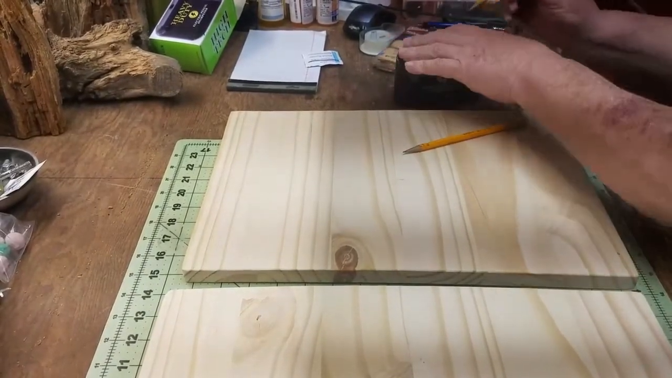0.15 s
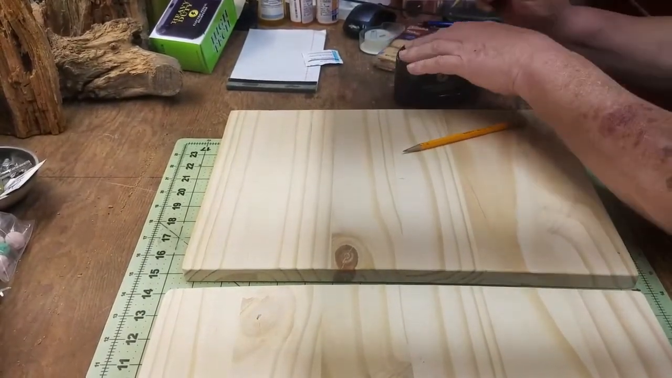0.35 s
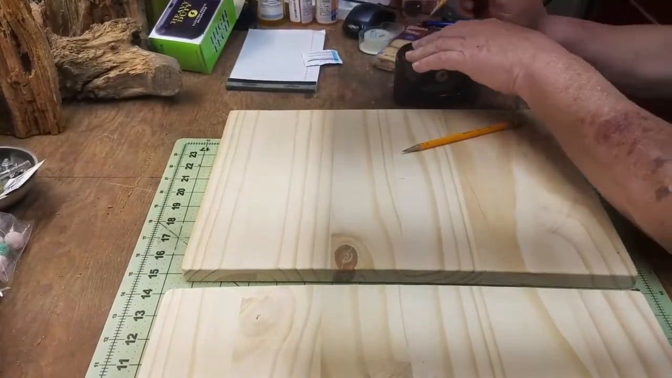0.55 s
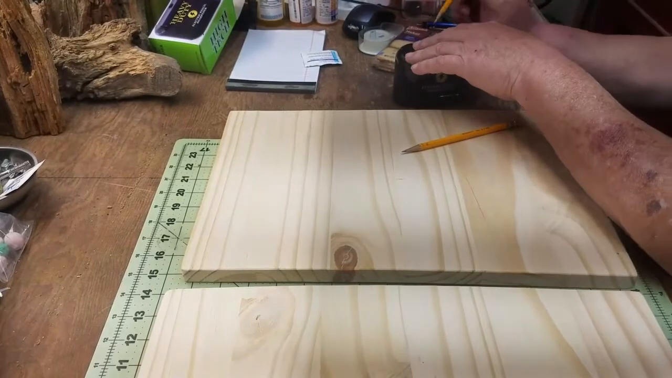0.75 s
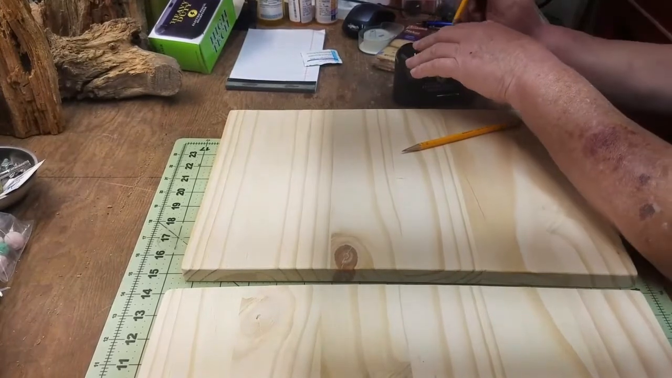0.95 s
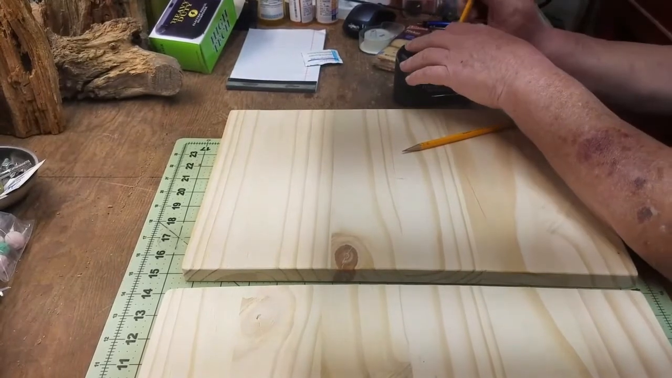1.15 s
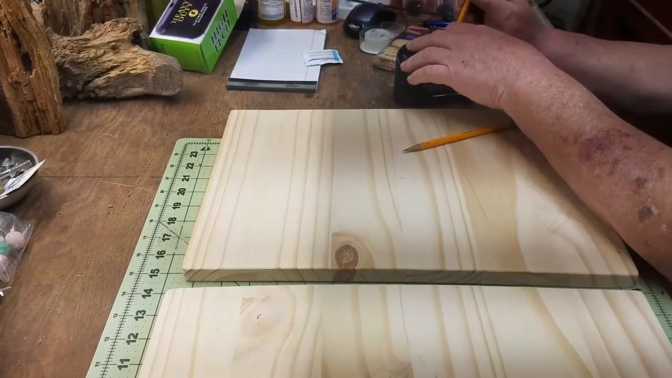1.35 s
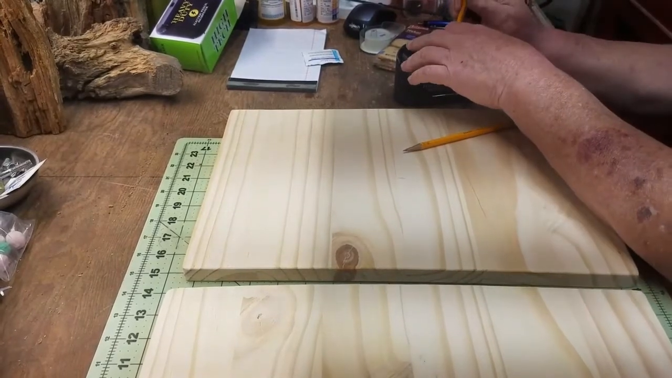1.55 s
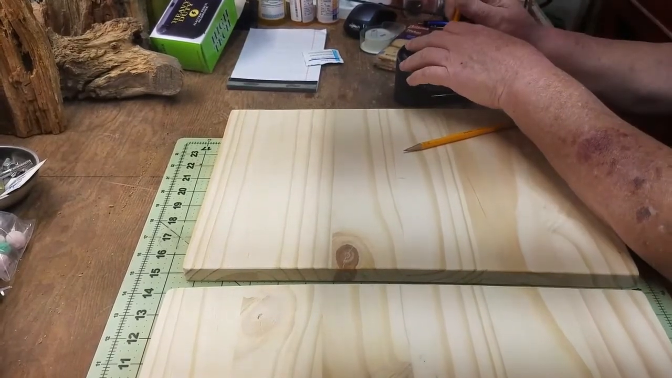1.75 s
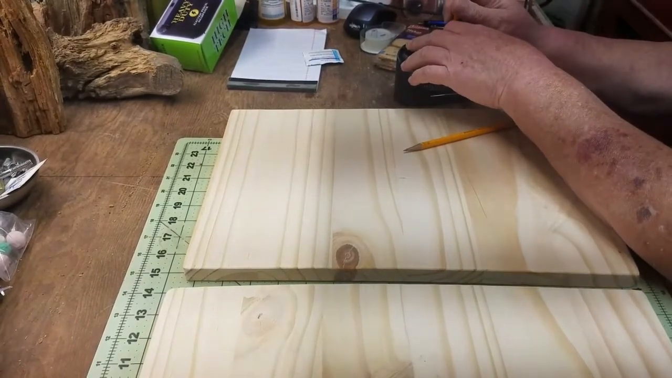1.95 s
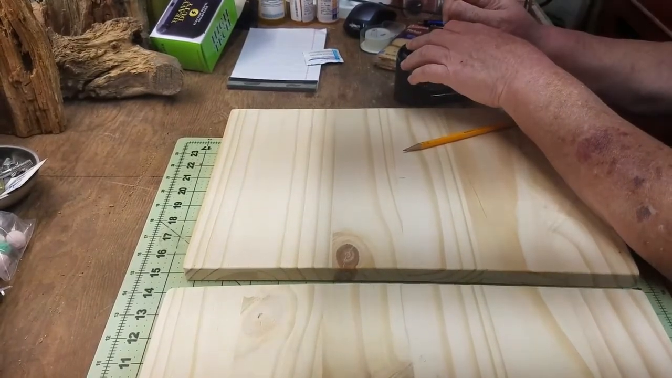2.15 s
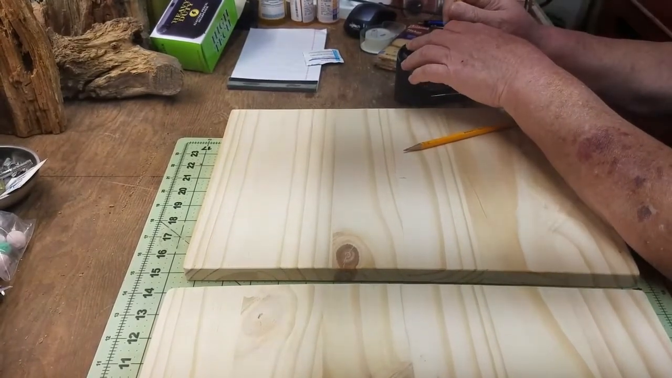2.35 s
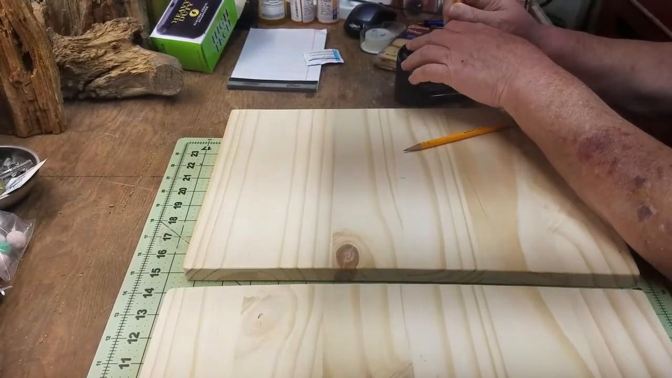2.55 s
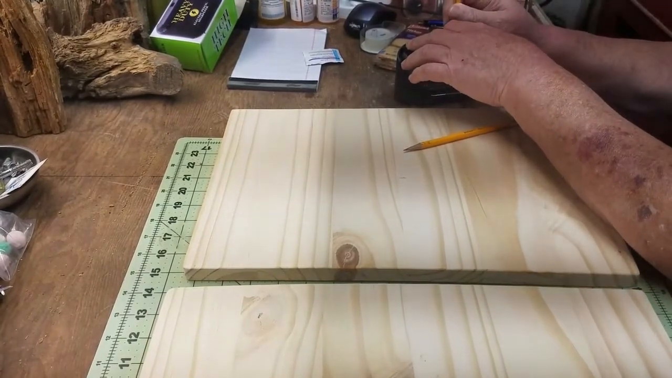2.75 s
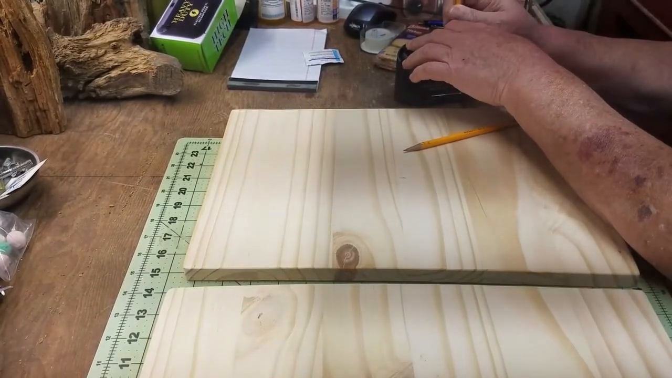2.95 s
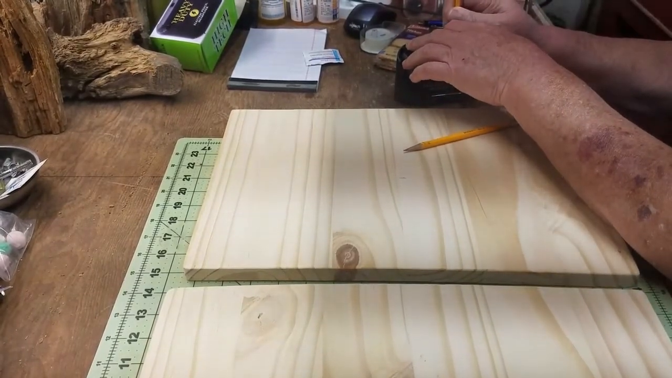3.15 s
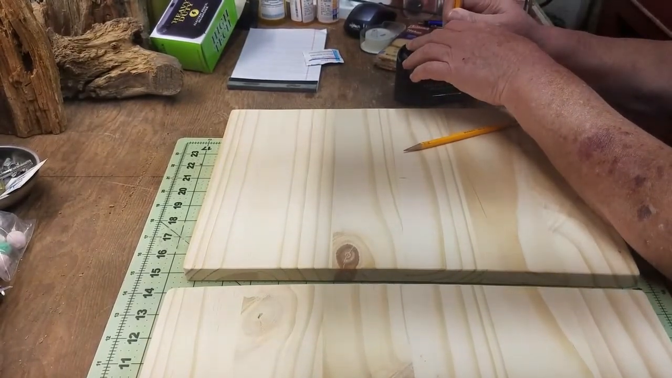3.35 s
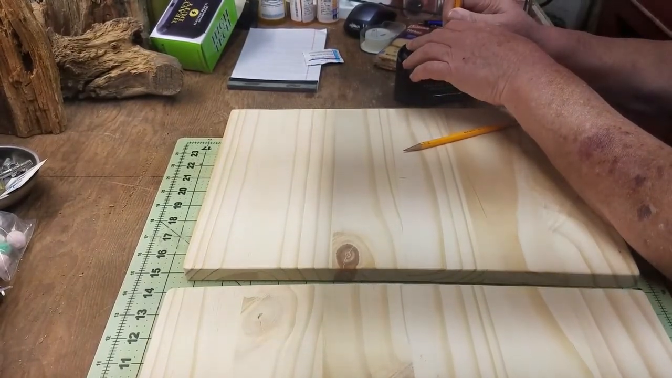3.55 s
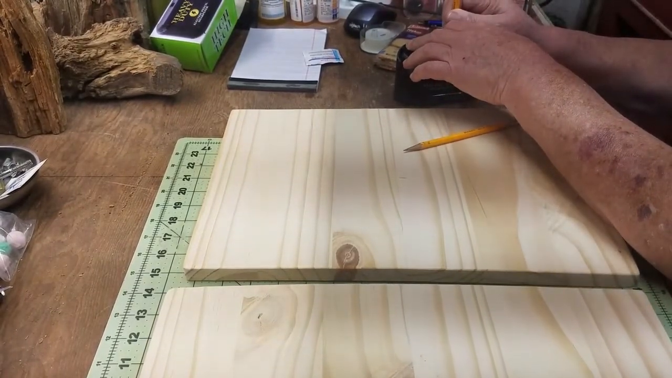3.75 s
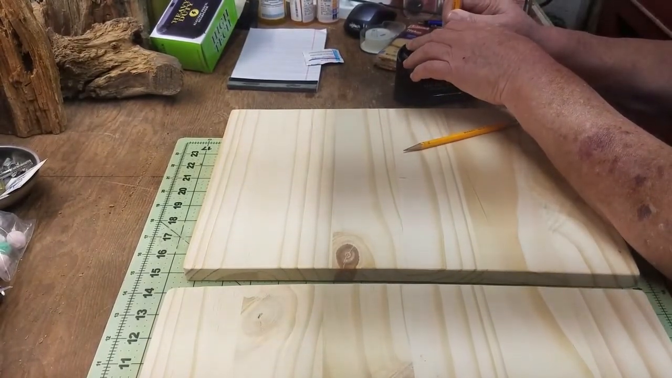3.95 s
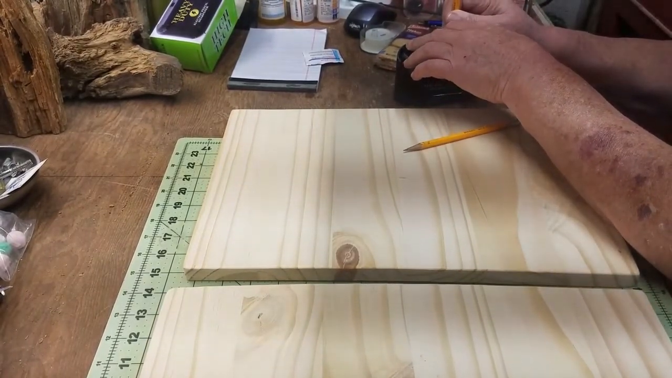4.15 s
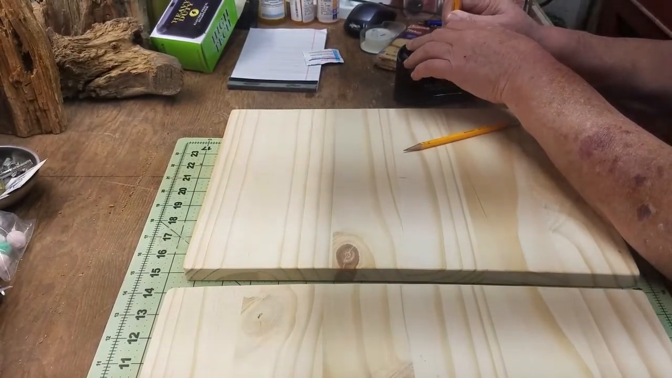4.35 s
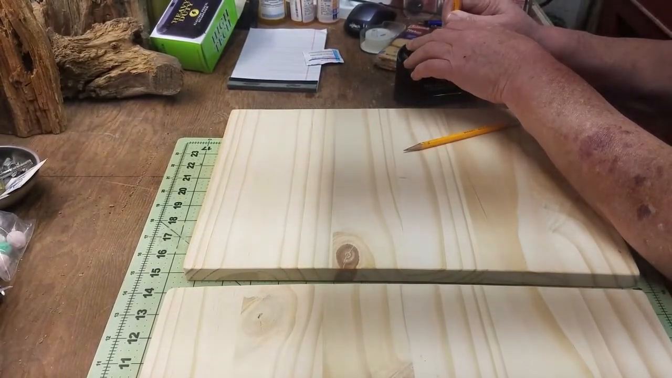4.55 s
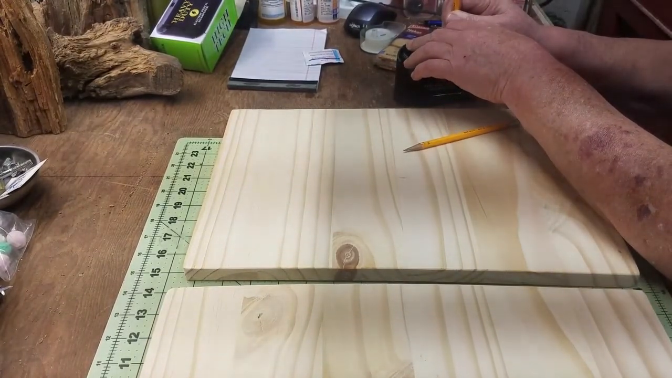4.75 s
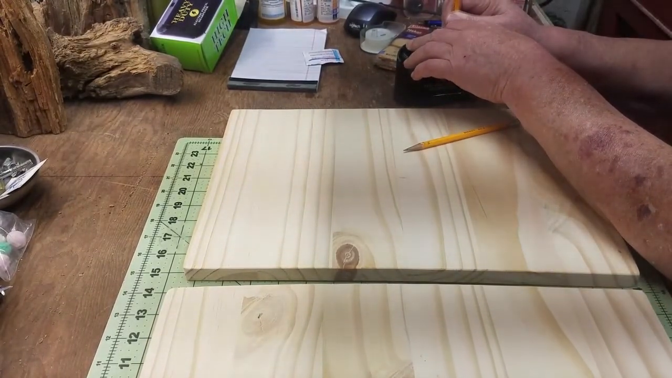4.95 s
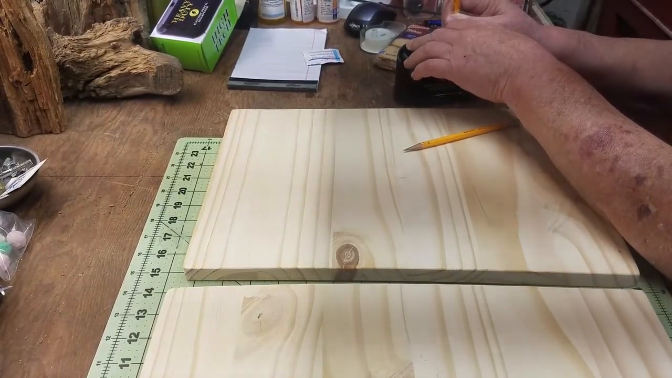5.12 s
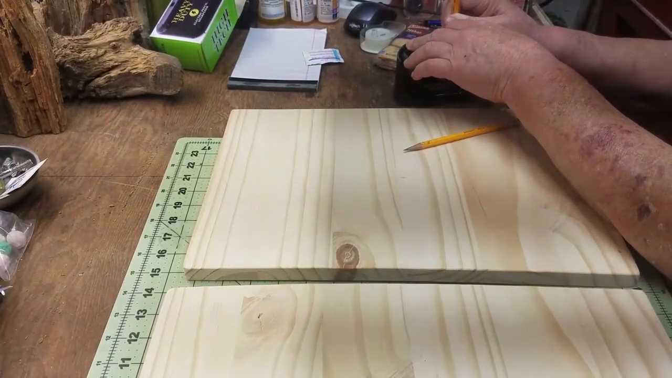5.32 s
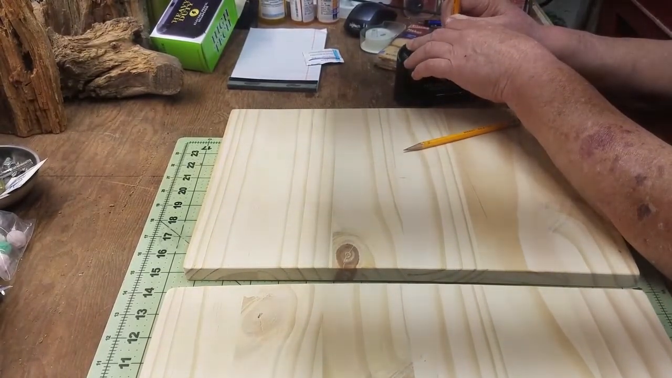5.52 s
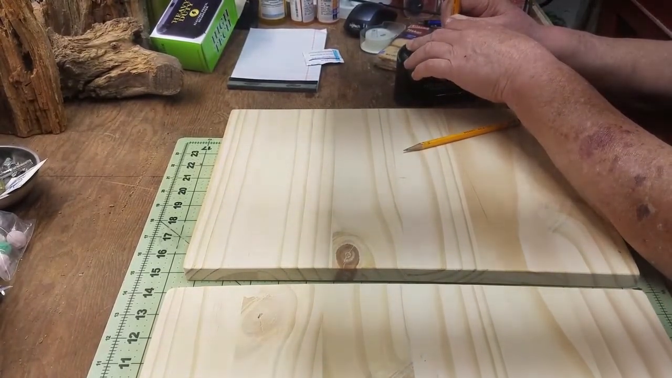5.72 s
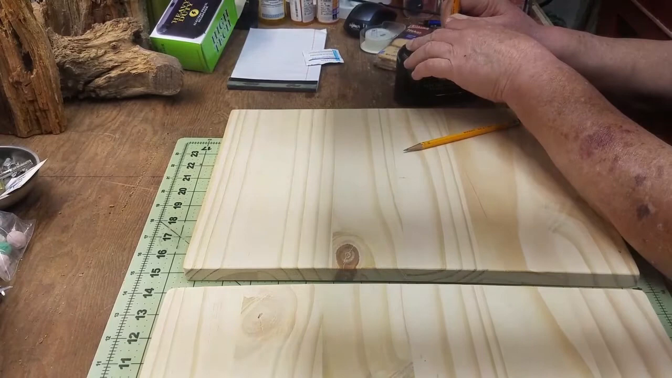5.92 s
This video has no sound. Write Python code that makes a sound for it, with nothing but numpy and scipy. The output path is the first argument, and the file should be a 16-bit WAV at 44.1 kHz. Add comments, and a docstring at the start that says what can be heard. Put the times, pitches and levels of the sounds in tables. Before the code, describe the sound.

After a few light taps in a quiet workshop, an electric pencil sharpener starts whining and rasping through a pencil.

```python
"""A quiet workshop, an electric pencil sharpener on a wooden workbench. A pencil taps the case, then the
motor spins up: a stack of shaft orders whines over the rasp of the cutter, which circles the pencil about
three times a second. The hollow case drones, the bench rumbles, and load makes the speed sag.
The sound drops out once for a moment; from there on the pencil is pressed harder."""
import sys
import numpy as np
from scipy import signal
from scipy.fft import rfft, irfft
from scipy.io import wavfile
from scipy.ndimage import uniform_filter1d

SR = 44100
rng = np.random.default_rng(int(sys.argv[2]) if len(sys.argv) > 2 else 0)


def generate_wav(signal):
    """Clip the signal to [-1, 1] and save it as 16-bit WAV at the path in sys.argv[1]."""
    frames = np.transpose(np.atleast_2d(signal))
    scaled = np.clip(frames, -1, 1) * 32767
    pcm = np.round(scaled).astype(np.int16)
    wavfile.write(sys.argv[1], SR, pcm)


N = 263718

# Noise spectra: (frequency [Hz], relative density [dB])
AIR_SPECTRUM = [(20, -1), (50, -13.5), (120, -10), (250, -15.5), (500, -15), (900, -23), (2000, -25.5),
                (5000, -32.5), (8500, -30.5), (11000, -35), (16000, -37)]
TAP_SPECTRUM = [(150, -45), (300, -10), (900, -11.5), (1500, -17), (3800, -17), (4300, -27), (9000, -28.5),
                (10000, -42), (16000, -45)]
RUMBLE_SPECTRUM = [(20, -56), (50, -8), (110, 2.5), (170, 2.5), (230, -24), (320, -30)]
DRONE_SPECTRUM = [(150, -40), (250, -14.5), (420, -7.5), (600, -11), (780, -7.5), (950, 3), (1150, -1.5),
                  (1350, -8), (1550, -17.5), (1800, -18), (2400, -39.5)]
RASP_SPECTRUM = [(900, -38), (1500, -17.5), (2000, -8.5), (2500, -9.5), (3100, -10.5), (4200, -8),
                 (5500, -9), (6800, -10), (9200, -11.5), (10600, -15.5), (13000, -19), (16000, -23)]
# Stereo likeness: (frequency [Hz], coherence [0..1])
AIR_COHERENCE = [(60, 0.31), (180, 0.087), (550, 0.26), (1650, -0.13), (4970, -0.0), (15000, 0.071)]
SHARPENER_COHERENCE = [(60, 0.36), (300, 0.48), (1400, 0.41), (3000, 0.075), (8000, 0.064), (15000, 0.2)]
# Stereo balance: (frequency [Hz], left minus right [dB])
AIR_PAN = [(30, 7), (120, -3.5), (600, -5), (3000, 1), (15000, 1)]
SHARPENER_PAN = [(60, 5), (180, -3.5), (550, -3), (1650, 0.5), (4970, -1), (15000, 1)]
# Case and cutter resonances and dips: (frequency [Hz], width [Hz], gain [dB])
TAP_MODES = [(356, 100, 7), (630, 120, 6), (2190, 200, 9), (3020, 250, 2), (5800, 630, 10.5),
             (8660, 600, 3)]
PRESSED_DRONE_DIPS = [(527, 180, -6.5), (1590, 150, -8), (940, 98, -3.5), (1310, 90, -1.5)]
RASP_MODES = [(3150, 240, -2), (4310, 250, -4.5), (7490, 460, 4.5), (8220, 570, 9)]
CASE_MODES = [(888, 35, 6), (1244.6, 70, 8), (1671, 59, 10.5), (2396, 79, 9.5)]
CUTTER_MODES = [(3560, 250, 3.5), (3920, 170, 2.5), (5770, 670, 5.5), (6150, 120, 6), (8500, 710, 7)]
# Room tones: (frequency [Hz], level [dB])
HUM_TONES = [(120, -65.5), (188, -74.5), (360, -72.5), (14900, -93)]
# Taps and ticks, and a faint decaying noise swell just before the motor starts: (time [s], onset level [dB],
# t60 [s], tilt [dB/octave])
CASE_BURSTS = [(.619, -55, .2, 1), (.631, -35.5, 0.18, -0.5), (0.636, -36.5, 0.13, 1.5), (.641, -40, 0.16, -1),
               (0.651, -58, 0.21, -3.5), (1.302, -58, .1, -2), (1.413, -53, 0.098, -2), (1.593, -60, .08, 12),
               (2.133, -49, 0.76, 0.5), (2.151, -38.5, 0.28, -3)]
# Bench rumble: (time [s], level [dB])
RUMBLE_LEVELS = [(2.3, -63), (2.36, -56), (3.16, -58.5), (3.86, -43), (5.27, -44.5), (5.3, -28.5),
                 (5.39, -54), (5.59, -43), (5.97, -46)]
# Motor, a list each before and after the drop-out:
# (time [s], shaft speed [Hz], grinding level [dB], loud-order gain [dB])
MOTOR_RUN = [
    [(2.36, 243.3, -20.5, -0.5), (2.41, 246.2, -19.5, 2.5), (2.54, 246.4, -19.5, -1),
     (2.63, 243.8, -20, 0.5), (2.84, 246.9, -22, -2), (2.93, 245.5, -20.5, 0), (3.03, 248, -19.5, -0.5),
     (3.05, 245.9, -19, -0.5), (3.16, 246.9, -19, -3), (3.25, 240.8, -19.5, 0.5), (3.38, 245.2, -18.5, 0.5),
     (3.64, 243.2, -20, 0), (3.71, 246.1, -17.5, 0), (3.85, 243.1, -18, -0.5), (4.06, 248.1, -18.5, 0),
     (4.15, 243.4, -17.5, 0), (4.34, 245.1, -18.5, 0.5), (4.42, 241.7, -17.5, 0.5)],
    [(4.48, 242.6, -16.5, -1), (4.542, 238.8, -18, -1.5), (4.646, 242.1, -20.5, 0),
     (4.716, 239.1, -19.5, 0), (4.774, 243.6, -20.5, 1.5), (4.864, 237.9, -21, 1),
     (4.894, 241.4, -17.5, 0.5), (4.96, 241.4, -19, -1), (4.998, 234.1, -20.5, -1.5),
     (5.122, 240, -17.5, -0.5), (5.188, 238.6, -19.5, 0.5), (5.264, 242.4, -19, 1),
     (5.326, 238.9, -19, 0.5), (5.636, 237.5, -18.5, -0.5), (5.7, 241.3, -20, 0), (5.808, 238.5, -19, 0.5),
     (5.852, 241.9, -19, 1), (5.97, 238.5, -20, -0.5)],
]
# Loud shaft orders: (order, light [dB], pushed home [dB], pressed [dB], left minus right [dB],
# swell [dB], swell lag [cycles], pressed swell [dB], pressed swell lag [cycles])
LOUD_ORDERS = [(1, -51.5, -43, -38.5, 0, 0.1, 0.2, 1.2, .01), (3, -50, -46.5, -39, -4.5, 3, .14, 3.5, .68),
               (4, -32, -34.5, -40, -2.5, 5, 0.9, 7, 0.33), (5, -27.5, -31, -31.5, 0, 1, 0.4, 5, .06),
               (6, -38, -34, -32.5, -8.5, 1, 0.38, 2, .99), (7, -39.5, -42, -37.5, -1, 1.7, 0.49, 2.5, 1),
               (9, -43.5, -37, -29.5, -9, 0.7, 0.39, 0.5, 0.32),
               (10, -35, -34.5, -32, -4.5, 2, 0.24, -0.1, 0.78)]
# Other shaft orders, mostly high: (order, left weight [dB], right weight [dB])
UPPER_ORDERS = [(2, -24, -21), (8, -9, -5), (11, -3, 0), (12, -5, -4), (13, -10, -9), (14, 0, -4),
                (15, -1, -3), (16, 0, 0), (17, -4, -4), (18, -3, -4), (19, -2, -2), (20, -2, 0),
                (21, -5, -2), (22, -3, -1), (23, -3, -3), (24, -3, -3), (25, -3, -3), (26, -7, -3),
                (27, -9, -9), (28, -9, -8), (29, -6, -5), (30, -5, -1), (31, -4, -3), (32, -3, 0),
                (33, 0, 1), (34, 2, 3), (35, 2, -1), (36, -1, -1), (37, -6, -6), (38, -10, -11),
                (39, -11, -11), (40, -11, -13), (41, -14, -15), (42, -15, -17)]
# Gain around the drop-out: (time [s], gain [dB])
DROPOUT = [(4.43, 2), (4.431, -8), (4.442, -17), (4.444, -34), (4.451, -35), (4.453, -90), (4.458, -88),
           (4.461, -34), (4.463, -5), (4.467, -1.5)]

START_S, PUSH_HOME_S, PRESS_S = 2.15, (3.12, 3.38), 4.45
CUTTER_HZ, LEFT_LAG_S = 3.2, 7e-5
TIME_S = np.arange(N) / SR
PAN = np.array([[.5], [-.5]])


def amp(db):
    return 10 ** (np.asarray(db) / 20)


def unit_rms(x):
    return x / np.sqrt(np.mean(abs(x) ** 2) + 1e-20)


def curve_at(points, hz):
    f, value = np.transpose(points)
    return np.interp(np.log(hz + 1), np.log(f + 1), value)


def peaks_db(modes, hz):
    return sum(db / (1 + (2 * (hz - f) / width) ** 2) for f, width, db in modes)


def staged(light, home, pressed):
    """Ramps as the pencil is pushed home, steps when it is pressed harder."""
    return np.where(TIME_S < PRESS_S, np.interp(TIME_S, PUSH_HOME_S, (light, home)), pressed)


def drift(rate_hz, count):
    """Slow random curves, rms 1."""
    step = 256
    knots = rng.standard_normal((N // step + 2, count))
    pole = np.exp(-2 * np.pi * rate_hz * step / SR)
    knots = unit_rms(signal.lfilter([1], [1, -2 * pole, pole ** 2], knots, axis=0)).T
    ramps = knots[:, :-1, None] + np.diff(knots)[..., None] * np.arange(step) / step
    return ramps.reshape(count, -1)[:, :N]


def noise(shape_db, coherence, patchy_db, flicker_db, lag_s=0):
    """Stereo noise, rms 1, with drifting spectral patches and a flicker common to all bands."""
    frames, hz = N // 256 + 5, np.fft.rfftfreq(1024, 1 / SR)
    a, b, c, d, patches = rng.standard_normal((frames, 513, 5)).T
    patches = unit_rms(uniform_filter1d(uniform_filter1d(patches, size=5, axis=0), size=18, axis=1))
    flicker = unit_rms(uniform_filter1d(rng.standard_normal(frames), size=10))
    shared = np.clip(curve_at(coherence, hz), -1, 1)[:, None]
    lead = np.exp(2j * np.pi * hz * lag_s)[:, None]
    left = a + 1j * b
    right = shared * left * lead + np.sqrt(1 - shared ** 2) * (c + 1j * d)
    gain = amp(shape_db(hz)[..., None] + patchy_db * patches + flicker_db * flicker)
    return unit_rms(signal.istft(gain * np.array([left, right]), nperseg=1024, noverlap=768)[1][:, :N])


def reflect(x, echo_db, t60_s):
    """Echoes off bench and clutter add narrow, static peaks and dips."""
    t = np.arange(4096) / SR
    echoes = rng.standard_normal((2, 4096)) * amp(-60 * t / t60_s) * (t > .001)
    echoes *= amp(echo_db) / np.linalg.norm(echoes, axis=1, keepdims=True)
    return x + signal.oaconvolve(x, echoes, axes=1)[:, :N]


def workshop(air_db=-59):
    """Still air and a few wavering tones."""
    shape_db = lambda hz: curve_at(AIR_SPECTRUM, hz) + PAN * curve_at(AIR_PAN, hz)
    out = amp(air_db) * noise(shape_db, AIR_COHERENCE, patchy_db=1.7, flicker_db=1.0)
    for hz, db in HUM_TONES:
        swell, wander = drift(4.7, count=2)
        gain = np.sqrt(2) * amp(db + 2.2 * swell - 2.4 * PAN)
        out += gain * np.sin(2 * np.pi * hz * TIME_S + 1.2 * wander)
    return out


def pencil_rub(start_s=0.81, end_s=1.2, centre_hz=2300, width_hz=350, level_db=-73):
    """The pencil slides into the guide: a faint, narrow-band scuff."""
    shape_db = lambda hz: -20 * np.log10(1 + (2 * (hz - centre_hz) / width_hz) ** 2)
    scuff = noise(shape_db, SHARPENER_COHERENCE, patchy_db=3.0, flicker_db=2.5)
    progress = np.clip((TIME_S - start_s) / (end_s - start_s), 0, 1)
    return amp(level_db) * scuff * np.sqrt(np.sin(np.pi * progress).clip(0))


def taps_and_swell(attack_s=0.00041):
    """Decaying noise bursts coloured by the plastic case: pencil taps and ticks, and a faint swell just before
    the motor starts."""
    size = 8192
    t, hz = np.arange(size) / SR, np.fft.rfftfreq(size, 1 / SR)
    case_db = curve_at(TAP_SPECTRUM, hz) + peaks_db(TAP_MODES, hz)
    out = np.zeros((2, N + size))
    for at_s, db, t60_s, tilt_db in CASE_BURSTS:
        common, left, right = rng.standard_normal((3, size))
        colour = amp(case_db + tilt_db * np.log2(hz / 1000 + .01))
        burst = unit_rms(irfft(rfft(common + 2.9 * np.array([left, right])) * colour))
        envelope = amp(db - 60 * t / t60_s) * np.clip(t / attack_s, 0, 1)
        out[:, round(at_s * SR):][:, :size] += burst * envelope
    return out[:, :N]


def bench_rumble(lumps_db=2, lumps_hz=6.0):
    """Lumpy low noise through the bench."""
    db = np.interp(TIME_S, *np.transpose(RUMBLE_LEVELS)) + lumps_db * drift(lumps_hz, count=1)[0]
    shape_db = lambda hz: curve_at(RUMBLE_SPECTRUM, hz)
    return amp(db) * noise(shape_db, SHARPENER_COHERENCE, patchy_db=2.5, flicker_db=1.5)


def grinding_noise(spectrum, modes, patchy_db, flicker_db):
    """Coloured noise placed at the sharpener."""
    shape_db = lambda hz: curve_at(spectrum, hz) + peaks_db(modes, hz) + PAN * curve_at(SHARPENER_PAN, hz)
    return noise(shape_db, SHARPENER_COHERENCE, patchy_db, flicker_db, LEFT_LAG_S)


def case_drone(gain_db, swell_db=0.5, lag_cycles=0.87):
    """The hollow case drones, swelling once a cutter round; harder pressure notches its spectrum."""
    light = grinding_noise(DRONE_SPECTRUM, [], patchy_db=1.5, flicker_db=1.6)
    pressed = grinding_noise(DRONE_SPECTRUM, PRESSED_DRONE_DIPS, patchy_db=1.5, flicker_db=1.6)
    swell = np.cos(2 * np.pi * (CUTTER_HZ * (TIME_S - PRESS_S) - lag_cycles))
    db = staged(-32, -32, -29) + swell_db * swell + gain_db
    return amp(db) * np.where(TIME_S < PRESS_S, light, pressed)


def cutter_rasp(level_db):
    """Hiss of cutter and gears."""
    hiss = grinding_noise(RASP_SPECTRUM, RASP_MODES, patchy_db=2.0, flicker_db=1.5)
    return amp(level_db + staged(1.42, -0.3, 3)) * reflect(hiss, echo_db=-13.0, t60_s=.12)


def upper_whine(angle_rad, shaft_hz, level_db):
    """Fluttering shaft orders, lifted near the cutter resonances."""
    out = np.zeros((2, N))
    for order, *sides_db in UPPER_ORDERS:
        a, b, c, d = drift(8.0, count=4)
        common, apart = a + 1j * b, c + 1j * d
        flutter = 1 + .6 * np.array([common, .8 * common + .6 * apart])
        # low orders strike together once a turn; high ones scatter
        scatter_rad = min(order / 12, 2) ** 2 * rng.standard_normal()
        gain = amp(peaks_db(CUTTER_MODES, order * shaft_hz)) * amp(sides_db)[:, None]
        out -= gain * (flutter * np.exp(1j * (order * angle_rad + scatter_rad))).real
    return amp(level_db + staged(0, -0.7, 3)) * unit_rms(reflect(out, echo_db=-9.0, t60_s=.15))


def loud_whine(angle_rad, shaft_hz, gain_db, waver_db=1.2, waver_hz=4.1, chatter_db=2.33):
    """Shaft orders lifted by case resonances; they swell once a cutter round, twice when pressed."""
    rounds = CUTTER_HZ * (TIME_S - PRESS_S)
    out = np.zeros((2, N))
    for order, *stages_db, pan_db, once_db, once_lag, twice_db, twice_lag in LOUD_ORDERS:
        swell_db = np.where(TIME_S < PRESS_S, once_db * np.cos(2 * np.pi * (rounds - once_lag)),
                            twice_db * np.cos(2 * np.pi * (2 * rounds - twice_lag)))
        db = staged(*stages_db) + gain_db + swell_db + peaks_db(CASE_MODES, order * shaft_hz)
        db += waver_db * drift(waver_hz, count=1)[0]
        chatter, wander, left, right = drift(17.4, count=4)
        apart = np.array([left, right])
        gain = np.sqrt(2) * amp(db + chatter_db * chatter + PAN * pan_db + 0.51 * apart)
        out -= gain * np.cos(order * angle_rad + 0.3 * wander + 0.37 * apart[::-1])
    return out


def sharpener(start_speed_ratio=.47, spin_up_s=.045, tone_rise_s=.045, noise_rise_s=.027, attack_s=.0011):
    """The motor spins up and jitters under the cut; rasp and drone throb with each shaft turn."""
    running_s = np.maximum(TIME_S - START_S, 0)
    times_s, *columns = np.concatenate(MOTOR_RUN).T
    shaft_hz, grind_db, loud_db = (np.interp(TIME_S, times_s, column) for column in columns)
    shaft_hz *= 1 - (1 - start_speed_ratio) * np.exp(-running_s / spin_up_s)
    tone_fade_db = -34 * np.exp(-running_s / tone_rise_s)
    noise_fade_db = -15 * np.exp(-running_s / noise_rise_s)
    jitter = 1 + 0.00068 * drift(22.0, count=1)[0]
    angle_rad = 2 * np.pi * np.cumsum(shaft_hz * jitter) / SR
    stereo_rad = angle_rad - 2 * np.pi * PAN * LEFT_LAG_S * shaft_hz
    rumble = bench_rumble()
    whine = loud_whine(stereo_rad, shaft_hz, loud_db + tone_fade_db)
    whine += upper_whine(stereo_rad, shaft_hz, grind_db + .5 * tone_fade_db)
    grinding = cutter_rasp(grind_db + noise_fade_db) + case_drone(noise_fade_db)
    throb = 1 + 0.062 * np.cos(angle_rad) + 0.077 * np.cos(2 * angle_rad)
    return np.clip(running_s / attack_s, 0, 1) * (whine + throb * grinding + rumble)


def scene():
    return sharpener() + workshop() + taps_and_swell() + pencil_rub()


def record(dry, ceiling=.94, cutoff_hz=15760):
    """Drop-out, hard clip, low-pass."""
    gain_db = np.interp(TIME_S, *np.transpose(DROPOUT))
    clipped = np.clip(dry * amp(gain_db), -ceiling, ceiling)
    lowpass = signal.firwin(511, cutoff_hz, window=("kaiser", 9), fs=SR)
    return signal.oaconvolve(clipped, lowpass[None], "same")


dry = scene()
out = record(dry)
generate_wav(out)
```